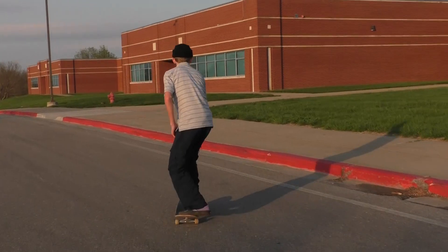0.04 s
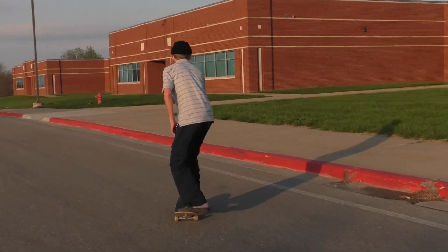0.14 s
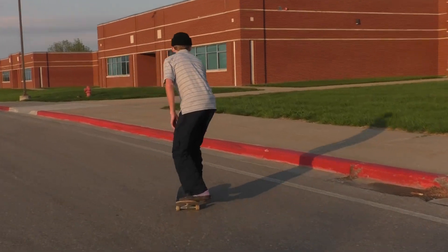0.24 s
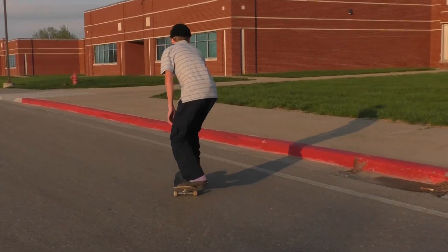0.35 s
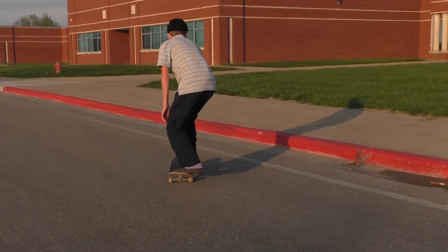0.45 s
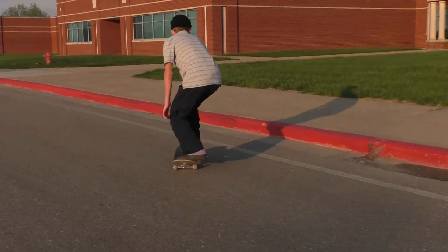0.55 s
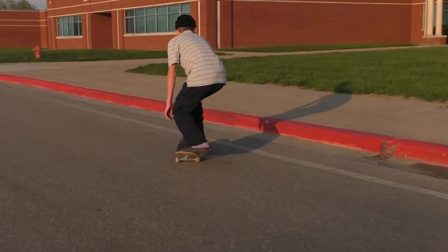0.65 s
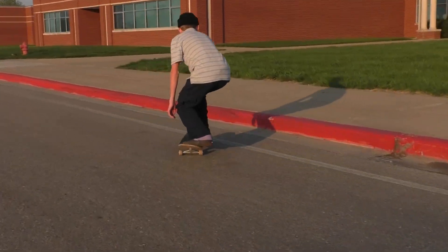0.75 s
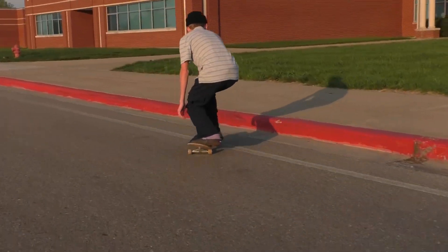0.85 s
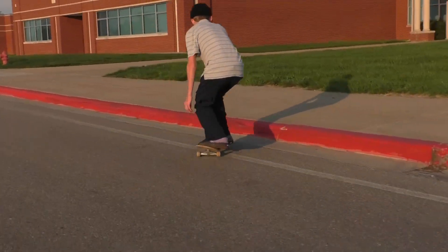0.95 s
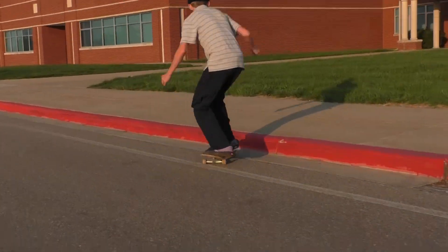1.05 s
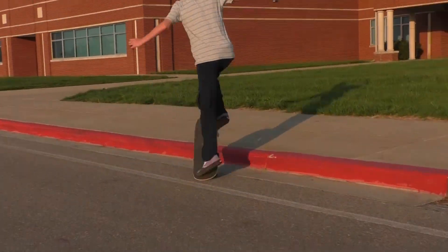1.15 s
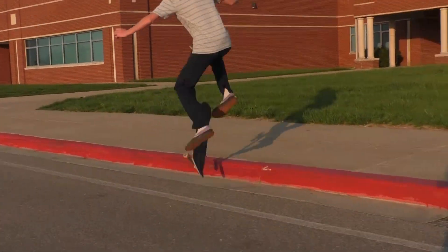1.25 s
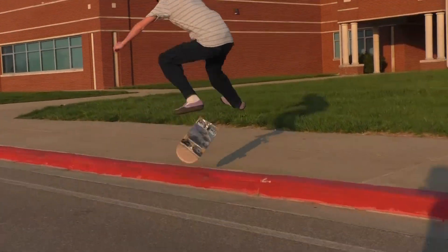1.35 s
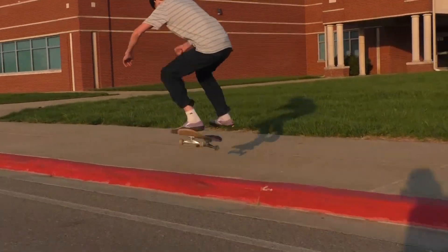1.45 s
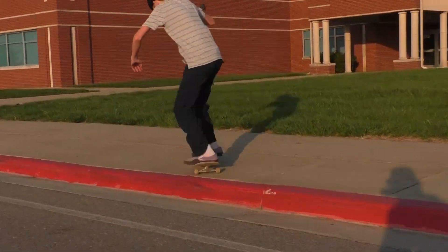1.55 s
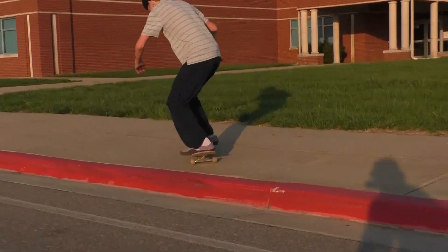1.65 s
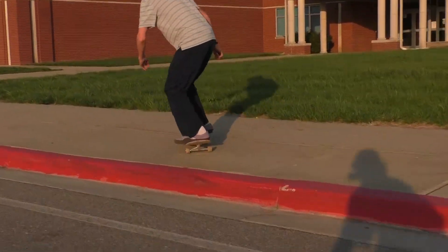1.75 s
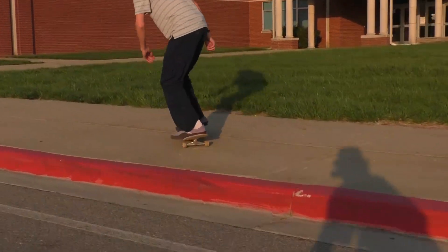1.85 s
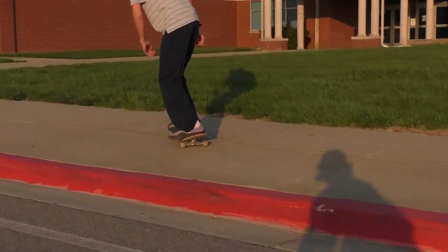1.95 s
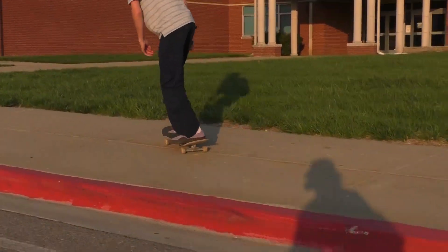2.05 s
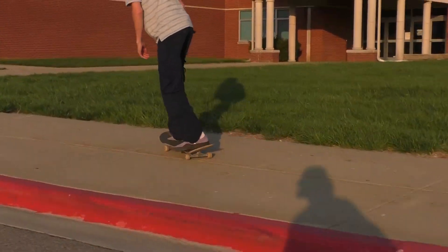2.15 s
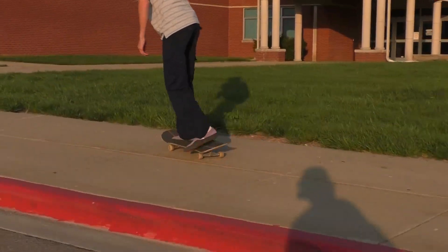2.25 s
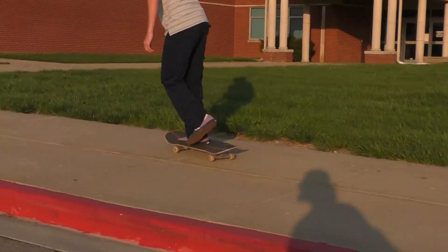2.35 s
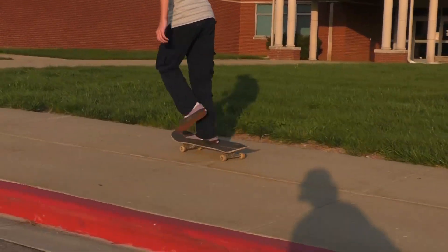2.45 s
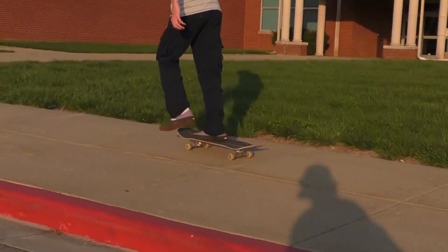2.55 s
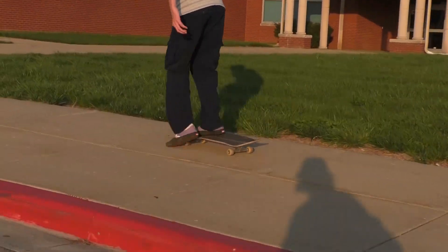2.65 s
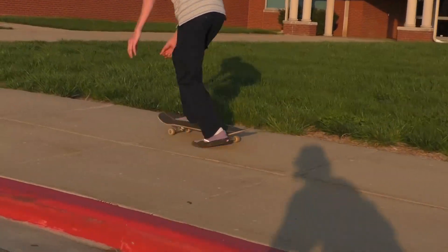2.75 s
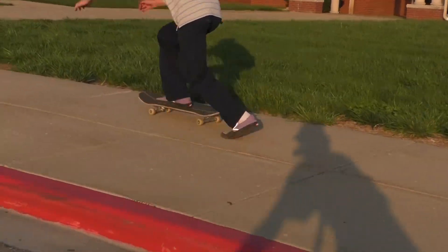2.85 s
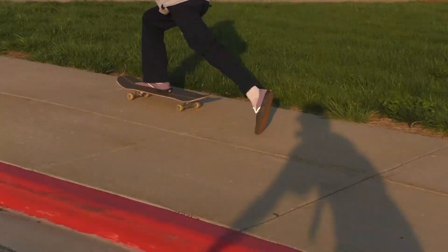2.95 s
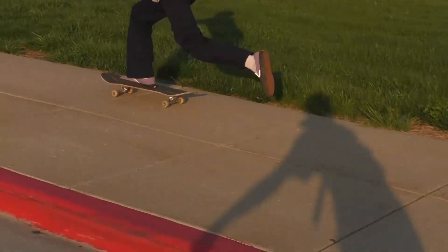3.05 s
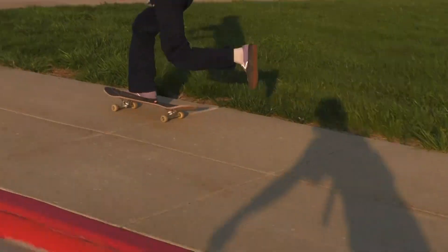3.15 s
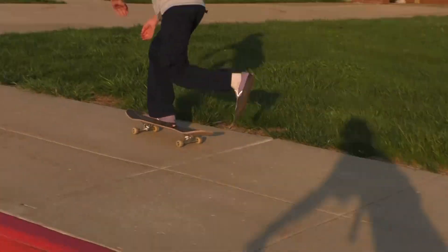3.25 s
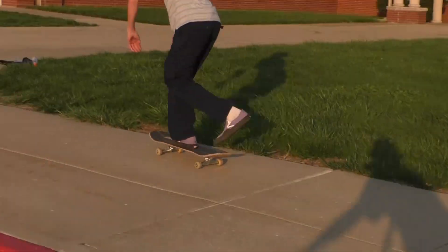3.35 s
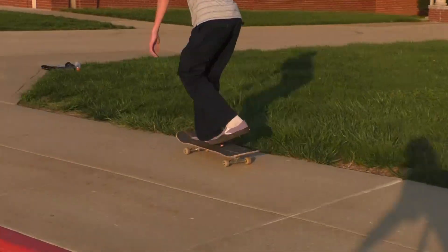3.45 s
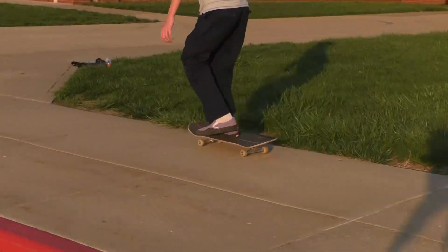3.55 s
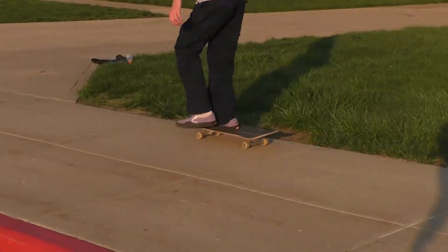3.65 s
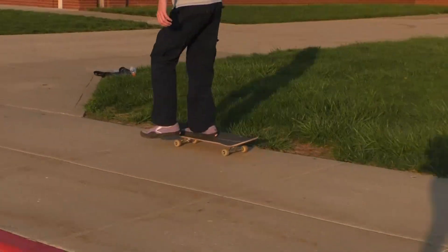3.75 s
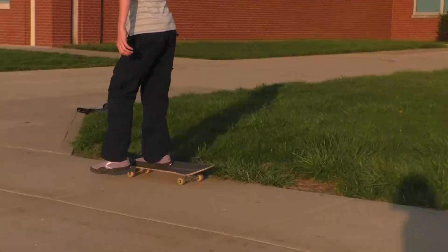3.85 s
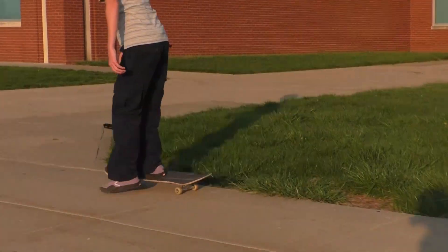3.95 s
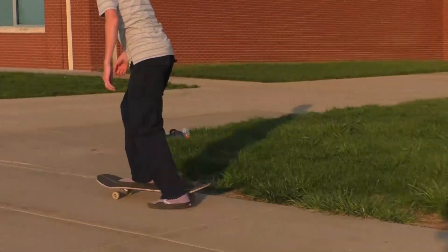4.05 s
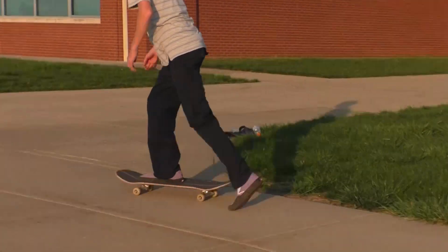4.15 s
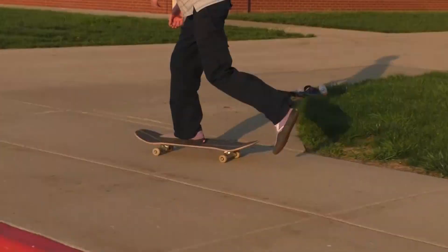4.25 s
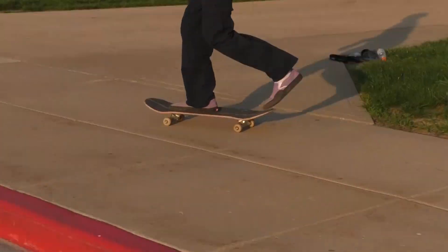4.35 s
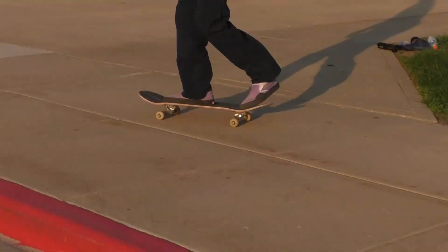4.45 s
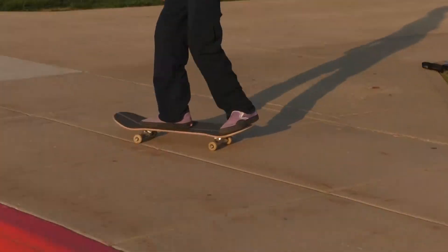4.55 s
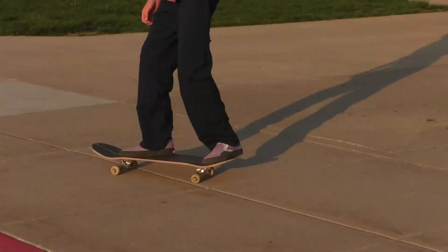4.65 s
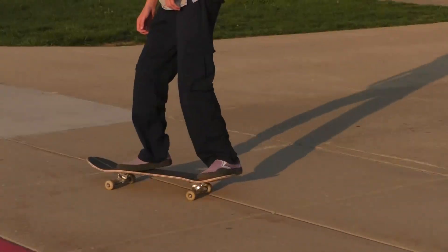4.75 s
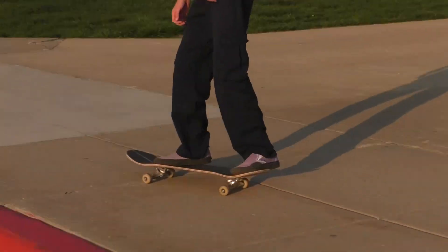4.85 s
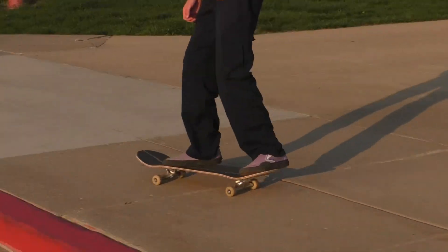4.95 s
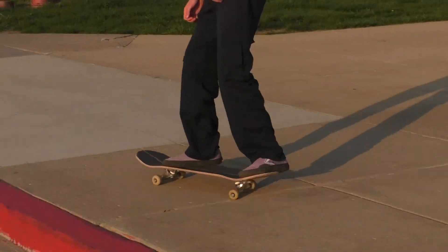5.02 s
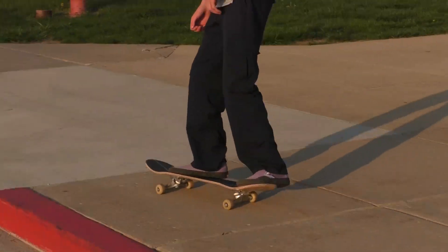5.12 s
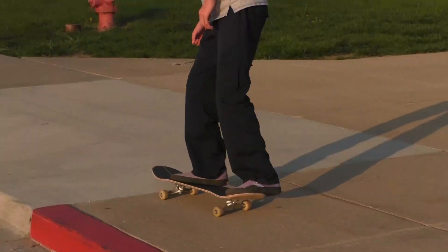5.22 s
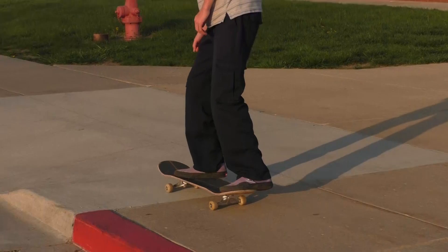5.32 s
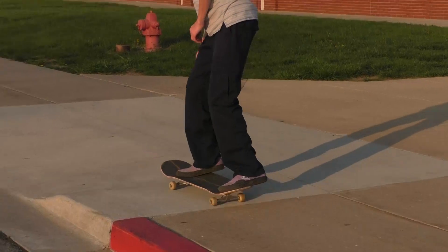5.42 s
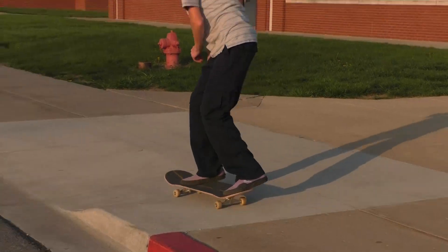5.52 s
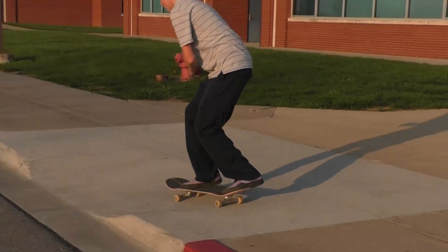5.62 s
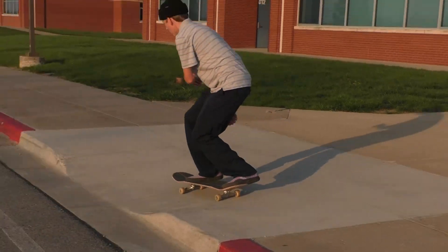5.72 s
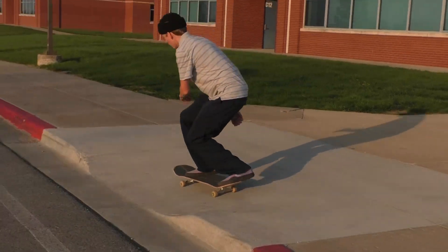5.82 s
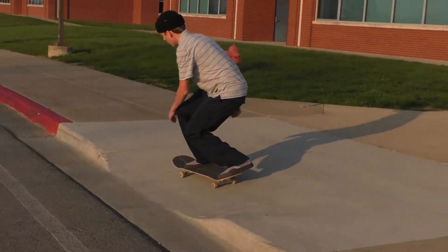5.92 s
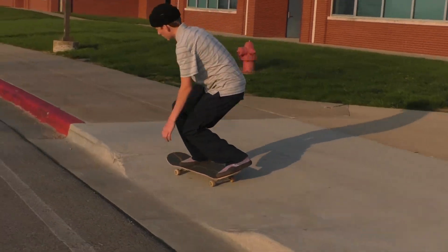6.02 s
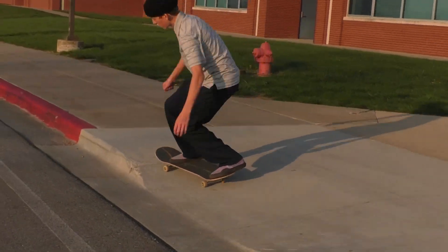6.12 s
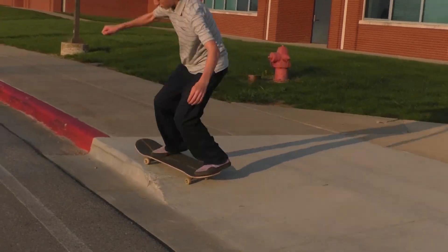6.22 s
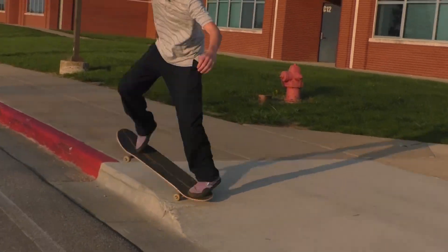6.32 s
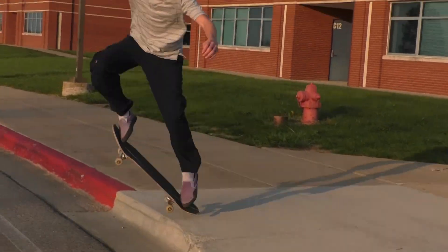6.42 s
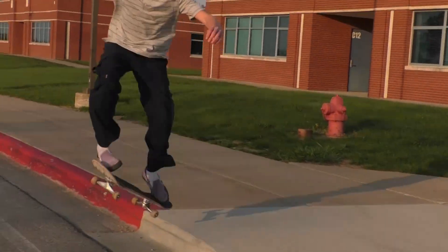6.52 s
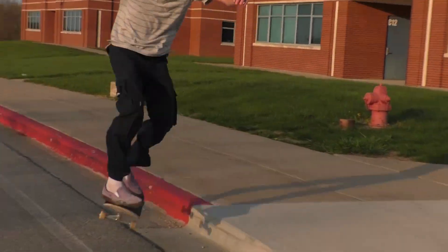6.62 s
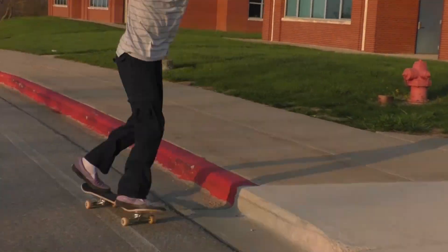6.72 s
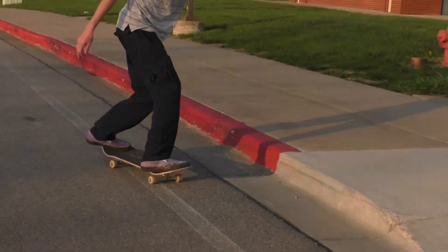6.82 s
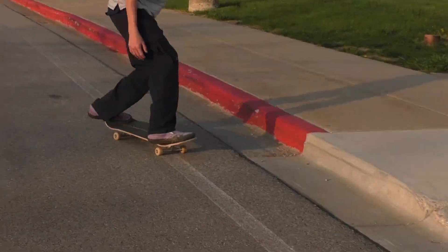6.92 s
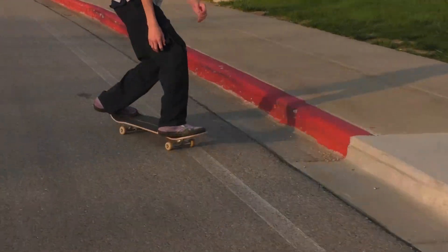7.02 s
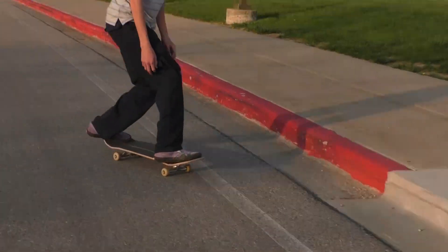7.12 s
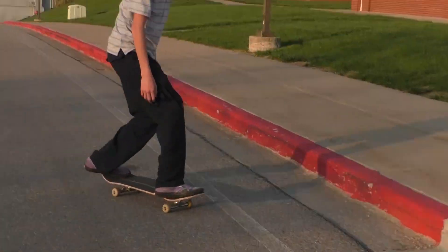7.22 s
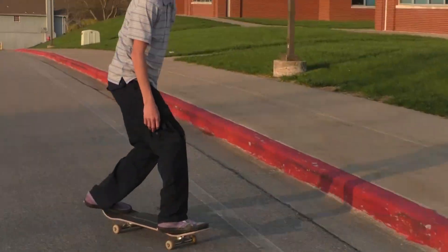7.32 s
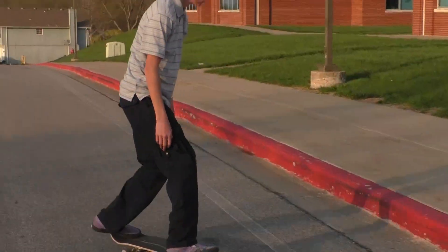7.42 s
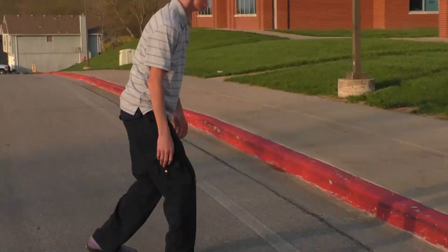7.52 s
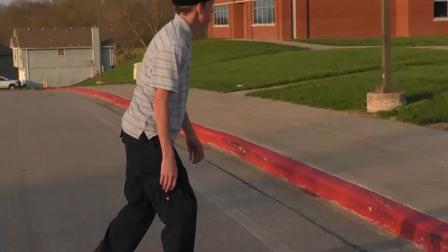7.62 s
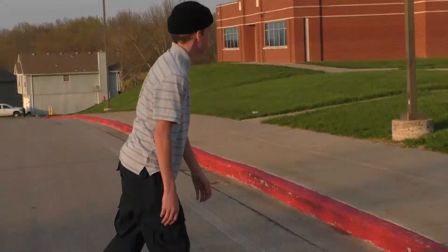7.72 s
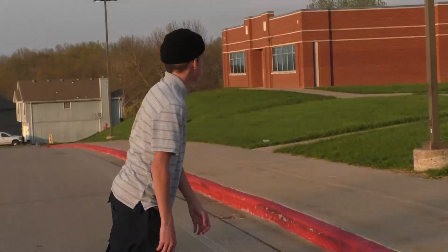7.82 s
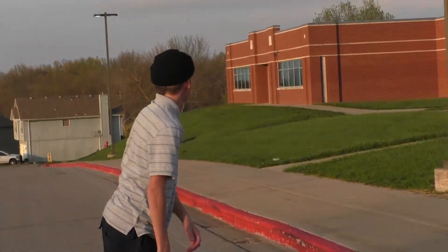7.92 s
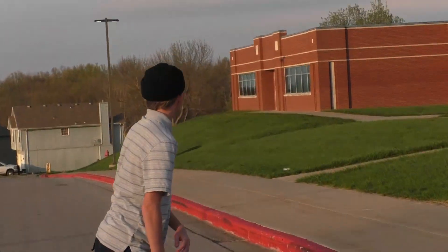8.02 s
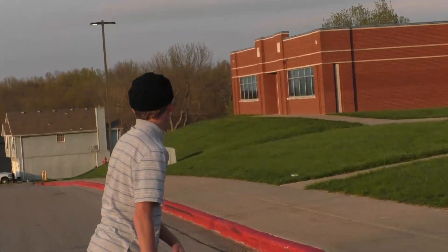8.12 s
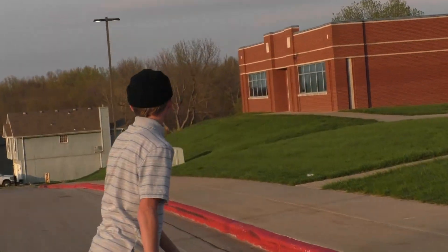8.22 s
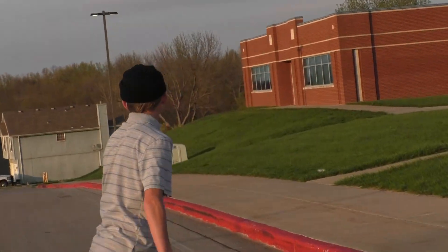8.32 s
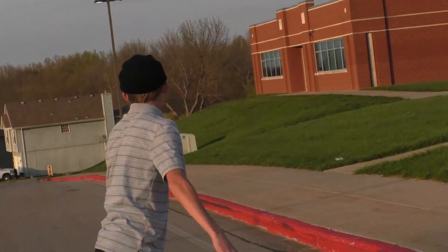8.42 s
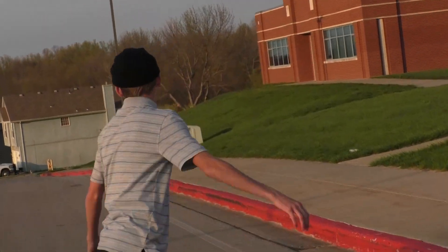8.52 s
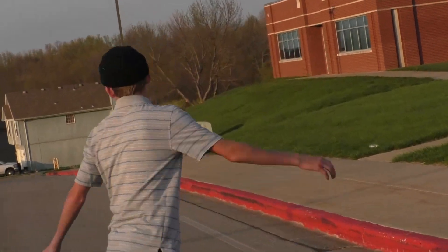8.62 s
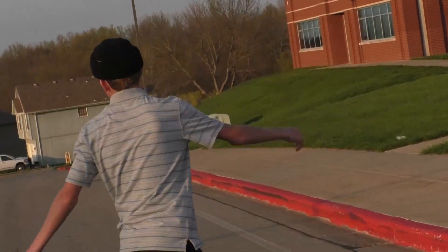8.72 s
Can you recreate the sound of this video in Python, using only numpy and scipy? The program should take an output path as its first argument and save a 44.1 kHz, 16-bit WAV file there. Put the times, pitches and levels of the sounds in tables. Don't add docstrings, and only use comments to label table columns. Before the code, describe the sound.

A close, continuous skateboard roll with crackling grit and hissing bearings, punctuated by loud tail snaps, landing slams and slab-joint clicks outdoors.

```python
import sys
import numpy as np
from scipy import signal
from scipy.fft import rfft, irfft, next_fast_len
from scipy.io import wavfile
from scipy.ndimage import map_coordinates

SR = 44100
rng = np.random.default_rng(int(sys.argv[2]) if len(sys.argv) > 2 else 0)


def materialize(psi):
    bounded = np.clip(np.atleast_2d(psi).T, -1, 1)
    quanta = np.round(bounded * 32767).astype(np.int16)
    wavfile.write(sys.argv[1], SR, quanta)


def convert_level_to_amplitude(level_db):
    exponent = np.asarray(level_db, float) / 20
    return 10 ** exponent


N = 386757

# pitch_hz, level_db (per Hz)
HISS_SPECTRUM = [(3240, -25), (5500, -32), (6060, -6), (6720, -2.5), (9460, 5), (11400, 1.5), (13500, -6),
                 (15100, -4), (15900, -20)]


def unit(x):
    return x / np.sqrt(np.mean(x ** 2) + 1e-20)


def along(points, hz):
    point_hz, value = np.transpose(points)
    return np.interp(np.log(hz + 1), np.log(point_hz + 1), value)


def curves(rows):
    start_s, *columns = np.transpose(rows)
    return [np.interp(np.arange(N) / SR, start_s, column) for column in columns]


def wobble(rate):
    knots = rng.standard_normal(int(N * rate / SR) + 4)
    return map_coordinates(knots, [np.arange(N) * rate / SR])


def filtered(x, response):
    size = next_fast_len(N + 8192)
    spectrum = rfft(x, size) * response(np.fft.rfftfreq(size, 1 / SR))
    return irfft(spectrum, size)[..., :N]


def band(f, low_hz, high_hz):
    def pole(u):
        return 1 / (1 + np.sqrt(2) * 1j * u - u ** 2) ** 2

    return pole(f / high_hz) * (1j * f / low_hz) ** 4 * pole(f / low_hz)


def modes(table, f):
    total = 0
    for k, (hz, width_hz, db) in enumerate(table):
        damping = 1j * f * width_hz
        total = total + (-1) ** k * convert_level_to_amplitude(db) * damping / (hz * hz - f * f + damping)
    return total


def paired(drive, response):
    # pitch_hz, left_right_correlation (0 to 1)
    likeness = [(100, 0.96), (200, 1), (400, .98), (800, 1), (1500, 0.92), (4000, 0.91), (8000, .985),
                (14000, 1)]

    def mid_side(hz):
        turn = np.arccos(np.clip(along(likeness, hz), -1, 1)) / 2
        return response(hz) * [np.cos(turn), np.sin(turn)]

    mid, side = filtered(drive, mid_side)
    return unit(np.array([mid + side, mid - side]))


def stones(rate, spread_db, share):
    struck = rng.random(N) < rate / SR
    size = convert_level_to_amplitude(spread_db * np.minimum(rng.exponential(size=N), 4))
    bumps = unit(struck * size * rng.standard_normal((2, N)))
    roughness = rng.standard_normal((2, N))
    return np.sqrt(share) * bumps + np.sqrt(1 - share) * roughness


def rolling():
    # belly_db, nose_db, drone_db
    rumble = [
        [(0.0, -22.5, -7, -15, -21), (0.204, -27, 0.5, -7.5, -16), (0.326, -30, 5.5, -7, -15),
         (0.362, -22.5, -5, -5.5, -13), (0.422, -22, -4.5, -17, -31), (0.454, -28.5, 3.5, -5, -14),
         (0.702, -22.5, -6, -16.5, -17), (1.134, -25, -1, -6.5, -15), (1.602, -24, -0.5, -13, -19),
         (1.63, -35.5, 5, 2, -11)],
        [(1.645, -33, -1, -1, -15), (1.699, -31.5, 3, -9, -13), (1.989, -24.5, -6.5, -15, -17.5),
         (2.047, -35, 8.5, 0, -3), (2.085, -24, -5.5, -15, -22), (2.305, -29, 1.5, -10, -8),
         (2.327, -24, -3.5, -14, -14.5), (3.071, -26.5, -0.5, -9.5, -4.5), (3.14, -25, -8, -21, -6)],
        [(3.155, -42, -1, 3, 4), (3.179, -26.5, -9, -22, -5), (3.275, -38, 3, -7, -7)],
        [(3.29, -34, 0, -2, -1), (3.33, -25, -13, -18, -12), (3.59, -32, 1, -7, -7), (3.64, -34, 4, -7, 1),
         (3.83, -20.5, -10, -14, -26), (3.85, -31, 4, -9, -5), (3.89, -23.5, -6, -4, -19),
         (3.98, -24.5, -6, -6, -19), (4.08, -22.5, -7, -15, -32), (4.12, -27.5, -1, -8.5, -9),
         (4.18, -22.5, -11, -23, -17), (4.26, -34, 7, 2, 3), (4.28, -25, -24, -15, -18),
         (4.32, -31.5, 1, -6, -3.5), (4.43, -25, 1, -10, -11.5), (6.7, -23, -3, -11.5, -12),
         (6.76, -23, -2, -15, -22), (6.79, -25.5, -6, -2, -32)],
        [(6.8, -33.5, -9, 1.5, -12), (6.838, -32, 5, -13, -9), (6.86, -27, -5, -10, -27),
         (6.892, -29, 1.5, -8.5, -10.5), (7.348, -28.5, 0, -10, -8), (7.386, -35, 9.5, -6, 0),
         (7.446, -25, -2, -13.5, -16), (7.804, -27, -3, -14, -6), (7.946, -25.5, -3, -16, -11.5),
         (8.648, -24.5, -4, -10, -8), (8.77, -23.5, -5, -4, -14)],
    ]
    # pitch_hz, width_hz, level_db
    hollow_modes = [(537.5, 101.5, -3.5), (637, 71, 0), (749, 107, -6)]
    belly_modes = [(316, 88, -0.5), (456.6, 143, 0.5)]
    nose_modes = [(890, 112, 2.5), (1010, 150, 2.5), (1250, 304, -9)]
    drone_modes = [(135, 120, -15), (221.4, 79, 3.5)]

    def shake(table, low_hz, high_hz):
        road = stones(900, spread_db=2.5, share=0.27)
        return paired(road, lambda f: modes(table, f) * band(f, low_hz, high_hz))

    hollow_db, belly_db, nose_db, drone_db = curves(np.concatenate(rumble))
    deck = shake(hollow_modes, 412, 1090)
    deck = deck + convert_level_to_amplitude(belly_db) * shake(belly_modes, 255, 550)
    deck = deck + convert_level_to_amplitude(nose_db) * shake(nose_modes, 670, 2030)
    deck = deck + convert_level_to_amplitude(drone_db) * shake(drone_modes, 96, 380)
    return convert_level_to_amplitude(hollow_db + 0.93 * wobble(25)) * deck


def wheels():
    # start_s, grit_db, hiss_db
    surface = [
        [(0.0, -46, -58), (0.208, -48, -58), (0.698, -47.5, -57), (1.006, -48, -56.5), (1.162, -46, -54.5),
         (1.32, -49, -58.5), (1.474, -51, -59.5), (1.63, -49, -61)],
        [(1.645, -56, -64), (1.853, -51, -60), (2.185, -48, -57.5), (2.667, -48, -56), (2.975, -44, -52),
         (3.14, -42, -53)],
        [(3.15, -45, -57), (3.32, -48, -58.5), (3.62, -50.5, -58.5), (3.87, -44.5, -55.5), (4.04, -47.5, -57),
         (4.33, -50, -57.5), (4.8, -45, -54.5), (4.94, -46, -57), (5.07, -48, -56), (5.35, -44, -53),
         (5.64, -47, -55.5), (5.84, -46, -53), (6.14, -45, -53), (6.29, -44.5, -51), (6.46, -46.5, -55.5),
         (6.79, -48.5, -56)],
        [(6.8, -45, -55), (6.926, -51, -58), (7.188, -50, -56), (7.48, -50, -57), (7.65, -48, -55),
         (7.88, -46, -52.5), (8.144, -50, -58), (8.374, -46.5, -56), (8.522, -46, -54), (8.77, -45, -53)],
    ]
    # pitch_hz, level_db (per Hz)
    grit_spectrum = [(820, -29), (1400, -1), (1810, -4), (2200, -5.5), (2520, -8), (5570, -17),
                     (6080, -19.5), (7000, -31.5), (9100, -55), (15400, -120)]

    grit_db, hiss_db = curves(np.concatenate(surface))
    coarse = wobble(30)
    crunch = convert_level_to_amplitude(1.7 * coarse + 1.05 * wobble(120)) * stones(500, spread_db=3.0, share=0.25)
    whirr = convert_level_to_amplitude(1.3 * coarse + 1.1 * wobble(110)) * stones(1500, spread_db=2, share=0.12)
    grit = paired(crunch, lambda f: convert_level_to_amplitude(along(grit_spectrum, f)))
    hiss = paired(whirr, lambda f: convert_level_to_amplitude(along(HISS_SPECTRUM, f)))
    return convert_level_to_amplitude(grit_db + 0.5) * grit + convert_level_to_amplitude(hiss_db + 0.84) * hiss


def wind():
    # start_s, buffet_db
    gusts = [(0.0, -56), (0.61, -59), (0.68, -65), (1.0, -54.5), (1.59, -54), (1.63, -59), (2.05, -67),
             (2.42, -55), (2.59, -66), (2.66, -54), (3.1, -52), (3.39, -49), (3.59, -49), (3.96, -57),
             (4.4, -42), (4.64, -56), (4.78, -45), (5.15, -53), (5.25, -44), (5.44, -72), (5.69, -67),
             (5.81, -80), (6.3, -71), (6.55, -57), (6.94, -87), (7.52, -75), (7.62, -64), (7.89, -62),
             (8.28, -85), (8.57, -66), (8.67, -76), (8.77, -63)]
    # pitch_hz, level_db (per Hz)
    buffet_spectrum = [(12, -47), (20, -16), (81, -2.5), (135, -2.5), (200, -3.5), (260, -26), (440, -120)]

    lumps = convert_level_to_amplitude(2.9 * np.array([wobble(6), wobble(6)]))
    air = rng.standard_normal((2, N))
    left, right = lumps * filtered(air, lambda f: convert_level_to_amplitude(along(buffet_spectrum, f)))
    opposed = np.array([left - 0.17 * right, right - 0.094 * left])
    return convert_level_to_amplitude(curves(gusts)[0] + 8.5) * unit(opposed)


def clacks():
    # start_s, peak_db, knock_db, sizzle_db (both relative to peak), ring_hz, t60_s
    contacts = [(0.7427, -32, 2, -8, 1000, 0.035), (1.23, -28, -3, -23, 1040, 0.035),
                (1.2454, -12.5, -6, -17.5, 2090, 0.036), (1.256, -29, -6, -11, 1000, 0.041),
                (1.5184, -36, 6, -13, 1020, 0.035), (1.5563, -18.5, -4, -18, 1000, 0.031),
                (1.564, -32, -5, -8, 1080, 0.042), (1.6227, -15.5, 1, -16, 1040, 0.037),
                (1.631, -13, 1, -18, 1000, 0.037), (1.6364, -19, 2, -9, 1610, 0.031),
                (1.646, -36, 0, -13, 1560, 0.029), (1.9766, -34, 3, -11, 1080, 0.038),
                (2.37, -32.5, -4, -8, 1000, 0.035), (2.5802, -30, -1, -12, 1220, 0.04),
                (2.8534, -19.5, -14, -13.5, 2870, 0.028), (2.9584, -21, -5, -9.5, 1010, 0.032),
                (3.1398, -11.5, 2, -16, 1240, 0.032), (3.1514, -18.5, -15, -12, 1350, 0.03),
                (3.213, -35, -4, -11, 1270, 0.035), (3.2374, -43, 17, -2, 1030, 0.032),
                (3.275, -16.5, 6, -14.5, 1550, 0.032), (3.2967, -30, 1, -6, 1260, 0.035),
                (3.5417, -26.5, 5, -6, 1660, 0.034), (3.5513, -26, 2, -10, 1180, 0.028),
                (3.6682, -24, -3, -10.5, 1460, 0.035), (3.6804, -27, -6, -9, 1010, 0.035),
                (3.7414, -33, 8, -10, 1000, 0.035), (3.817, -35, 9, -18, 1000, 0.035),
                (3.8841, -32, 10, -13, 1000, 0.035), (3.92, -25, 0, -12, 1080, 0.056),
                (4.214, -36.5, 5, -9, 1100, 0.04), (4.263, -37, 5, -17, 1050, 0.032),
                (4.3357, -33, -1, -7, 1000, 0.047), (4.5924, -31, 1, -11, 1010, 0.04),
                (4.6643, -30, 6, -9, 1090, 0.035), (4.7058, -23, 1, -15, 1030, 0.035),
                (4.725, -24, -2, -13, 1200, 0.035), (4.7486, -38, 6, -4, 1140, 0.032),
                (4.775, -31.5, 0, -20, 1220, 0.029), (4.828, -36, 6, -11, 1000, 0.035),
                (4.8643, -33, 8, -8, 1190, 0.035), (4.8946, -35, 9, -20, 1150, 0.035),
                (4.9693, -26, -10, -11, 1520, 0.035), (4.982, -21.5, 7, -12, 1040, 0.037),
                (5.1043, -23.5, 0, -13, 1000, 0.039), (5.1232, -25.5, -8, -19, 1110, 0.04),
                (5.1927, -28.5, 11.5, -17, 1030, 0.035), (5.2295, -28, 0, -20, 1000, 0.038),
                (5.238, -27, -4, -21, 1000, 0.035), (5.3765, -19, -5, -13, 2380, 0.041),
                (5.3958, -27, 3, -11, 1140, 0.027), (5.514, -19.5, -2, -10, 1000, 0.041),
                (5.521, -12, -2, -26, 1050, 0.024), (5.717, -28.5, -8, -3, 1000, 0.03),
                (6.0965, -33, 6, -6.5, 1040, 0.035), (6.2677, -20.5, -5, -15, 1000, 0.031),
                (6.285, -27, -7, -22, 1000, 0.04), (6.3001, -27, -8, -21, 1000, 0.035),
                (6.3198, -27, -10, -15, 1060, 0.04), (6.3425, -33, -4, -11, 1060, 0.032),
                (6.3763, -22, -9, -10, 1000, 0.037), (6.4702, -20.5, -3, -12, 1740, 0.043),
                (6.7733, -19, -3, -9, 1440, 0.035), (6.782, -24, -1, -10, 1270, 0.031),
                (6.7912, -9.5, -1, -16.5, 1290, 0.024), (6.8153, -24, 2, -8, 1250, 0.041),
                (6.8613, -37, 1, -14, 1030, 0.035), (6.949, -37, -2, -12, 1020, 0.035),
                (7.2446, -30.5, 12, -16, 1010, 0.03), (7.5223, -34, -5, -7, 1190, 0.035),
                (7.6275, -36, -1, -15, 1040, 0.035), (7.8101, -28.5, -7, -14, 1060, 0.051),
                (7.9854, -43, 7, -7, 1010, 0.031), (8.107, -34, 8, -10, 1000, 0.064),
                (8.1778, -35, -1, -22, 1010, 0.032), (8.3506, -31.5, 5, -12, 1070, 0.043),
                (8.4118, -38, 6, -20, 1010, 0.035), (8.4294, -30.5, 6, -18, 1000, 0.032)]
    # pitch_hz, width_hz, level_db
    truck_modes = [(2030, 395, 3.5), (3150, 870, -1), (4320, 1320, -6)]
    tail_modes = [(1150, 260, 1.5), (1600, 440, 2)]

    t = np.arange(SR // 8) / SR
    length = len(t)
    drives = np.zeros((3, 2, N + length))
    struck = np.zeros(N + length)
    for start_s, peak_db, knock_db, sizzle_db, ring_hz, t60_s in contacts:
        start = round(start_s * SR)
        bounces = rng.standard_normal(length // 50 + 1)
        chatter = convert_level_to_amplitude(4.27 * np.repeat(bounces, 50)[:length])
        decay = convert_level_to_amplitude(peak_db - 60 * (t / max(t60_s, 0.008)) ** 1.4)
        rattle = chatter * decay * (1 - np.exp(-t / 0.0008))
        share = convert_level_to_amplitude([0, min(knock_db, 6), sizzle_db])[:, None, None]
        drives[..., start:start + length] += share * rattle * rng.standard_normal((3, 2, length))
        wood = convert_level_to_amplitude(-60 * t[:900] / 0.015) * np.sin(2 * np.pi * ring_hz * t[:900])
        wood = wood / np.linalg.norm(wood)
        knock = np.convolve(rattle * rng.standard_normal(length), wood)
        struck[start:start + length] += knock[:length]

    def ring(drive, response):
        return paired(drive[:, :N], response) * np.std(drive[:, :N])

    trucks = ring(drives[0], lambda f: modes(truck_modes, f) * band(f, 1270, 7800))
    ends = ring(drives[1], lambda f: modes(tail_modes, f) * band(f, 640, 2500))
    sizzle = ring(drives[2], lambda f: convert_level_to_amplitude(along(HISS_SPECTRUM, f)))
    return convert_level_to_amplitude(-11) * trucks + convert_level_to_amplitude(-9) * ends + convert_level_to_amplitude(-6) * sizzle + convert_level_to_amplitude(-10.5) * struck[:N]


def scene():
    # start_s, left_minus_right_db
    pan = [
        (0.0, 1.5),
        (2.61, 2),
        (3.83, 0.5),
        (4.17, 2),
        (5.33, 0),
        (6.62, 1.5),
        (8.77, 0),
    ]
    # pitch_hz, left_minus_right_db
    port_tilt = [(200, -1.55), (600, 0), (1400, 2), (3000, 1), (8000, -2), (13000, -1)]

    def ports(f):
        tilt_db = along(port_tilt, f)
        return convert_level_to_amplitude([tilt_db / 2, -tilt_db / 2])

    pan_db = curves(pan)[0]
    boards = rolling() + wheels() + clacks()
    placed = boards * convert_level_to_amplitude([pan_db / 2, -pan_db / 2])
    return filtered(placed, ports) + wind()


def top_cut(x):
    return signal.sosfilt(signal.butter(12, 16660, fs=SR, output="sos"), x)


def record(dry):
    mix = filtered(dry, lambda f: f < 15880)
    return top_cut(mix)


dry = scene()
out = record(dry)
materialize(out)
```